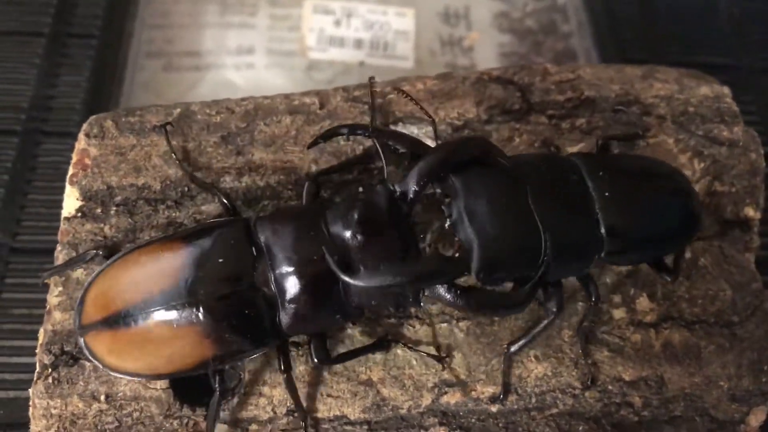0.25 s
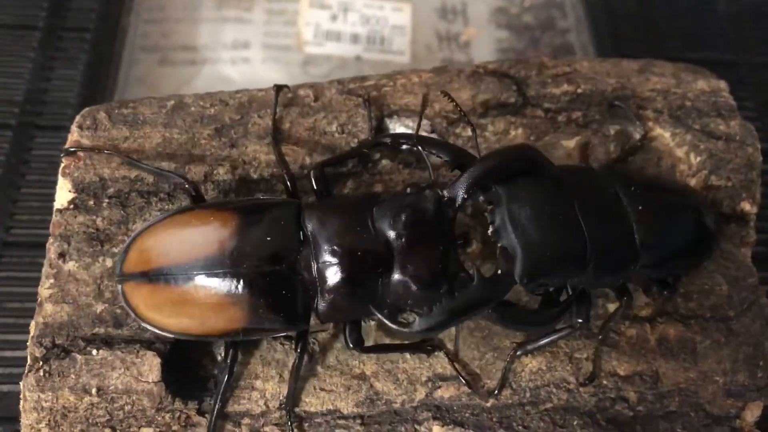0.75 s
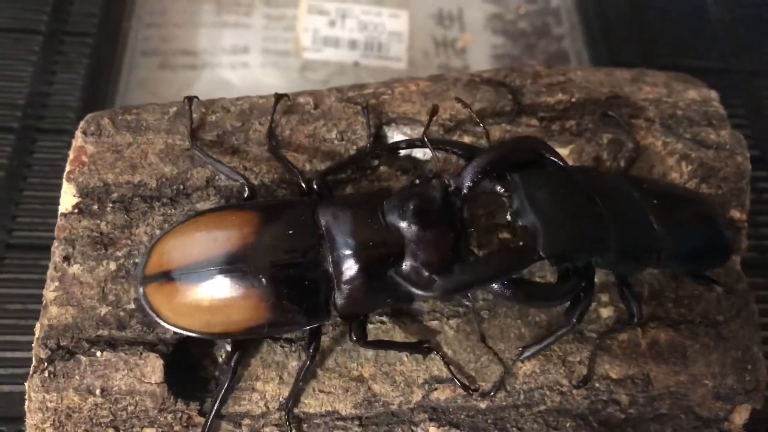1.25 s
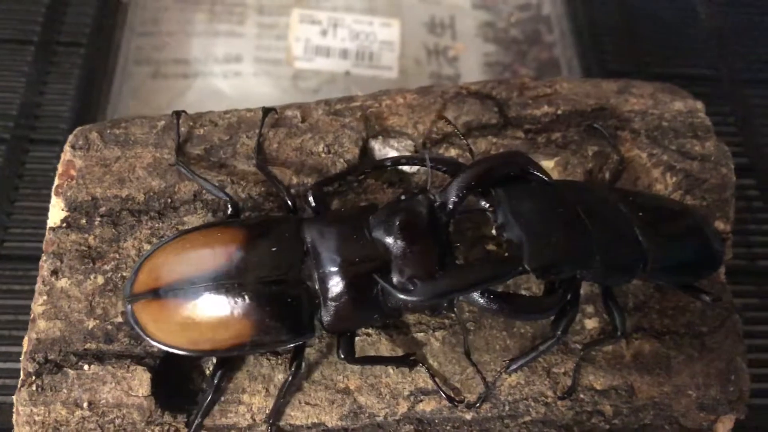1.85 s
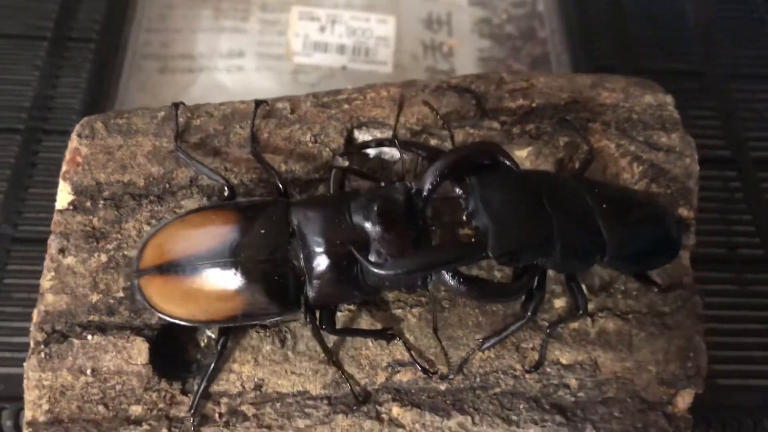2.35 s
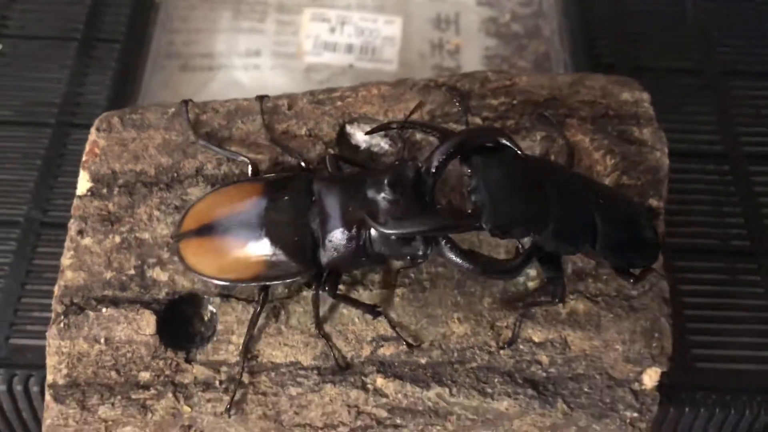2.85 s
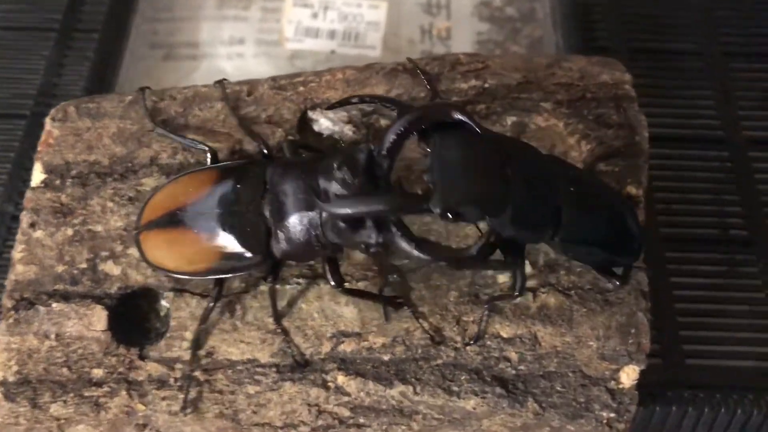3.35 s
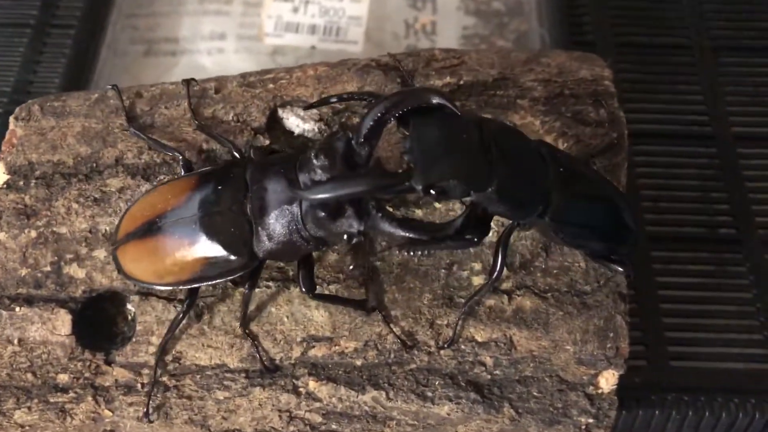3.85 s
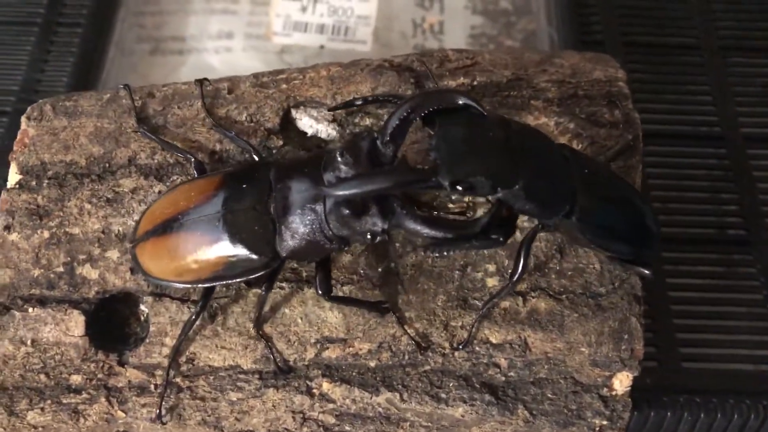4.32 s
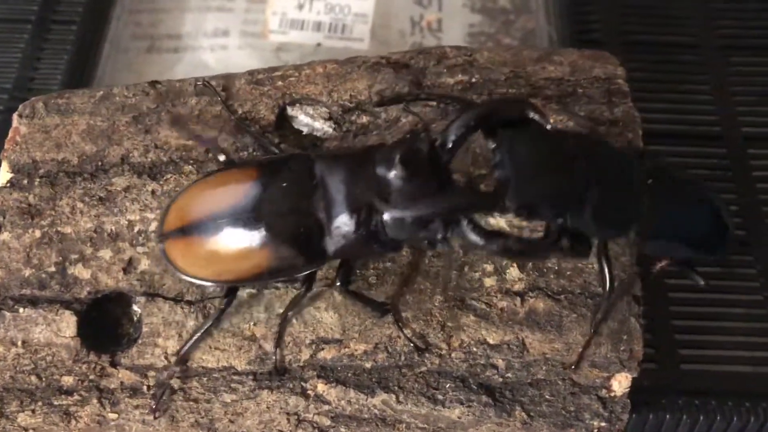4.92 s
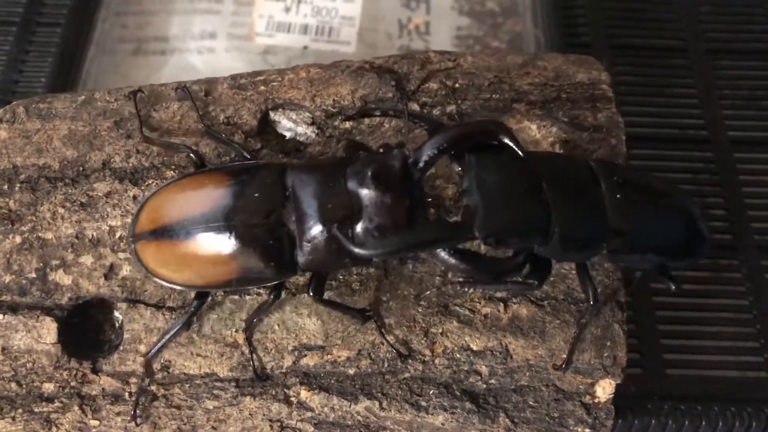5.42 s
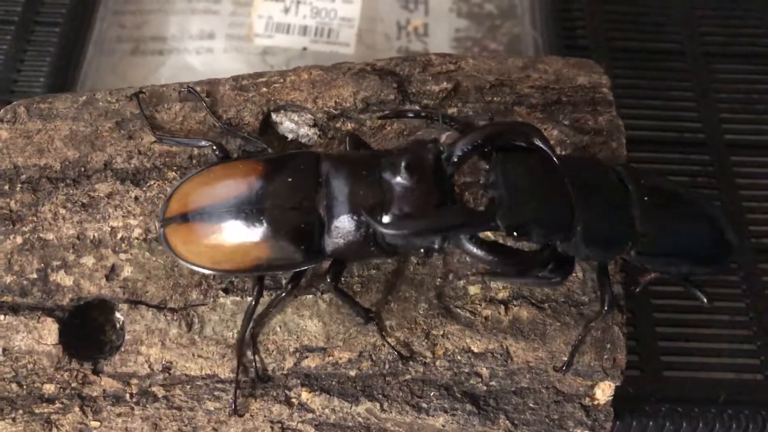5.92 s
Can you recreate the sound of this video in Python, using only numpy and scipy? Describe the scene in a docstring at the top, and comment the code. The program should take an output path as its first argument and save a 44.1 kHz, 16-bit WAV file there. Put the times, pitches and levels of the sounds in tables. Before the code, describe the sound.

Close, dry insect clicks and snaps with brief raspy scratching on bark, low dull log knocks, and a faint steady hiss in a quiet room.

```python
"""A faint scratch, then sharp little clicks: two stag beetles wrestle on a bark-covered log in a quiet room.
Jaws and shells snap and click: tiny noise bursts ring the shell and knock the bark.
Claws scratch the bark with dense, uneven noise grains, and shoves ring the log and its hollow with rough noise.
Faint ticks of feet and feelers fill in; a short noise tail makes the room's answer, over a steady hiss."""
import sys
import numpy as np
from scipy import signal
from scipy.fft import rfft, irfft
from scipy.io import wavfile

SR = 44100
rng = np.random.default_rng(int(sys.argv[2]) if len(sys.argv) > 2 else 0)


def materialize(psi):
    """Save the field psi as 16-bit PCM at rate SR to the path in sys.argv[1].

    A 1-D psi becomes a single channel; in a 2-D psi each row is a channel.
    """
    bounded = np.clip(np.atleast_2d(psi).T, -1, 1)
    quanta = np.round(bounded * 32767).astype(np.int16)
    wavfile.write(sys.argv[1], SR, quanta)


N = 272538  # length of the scene in samples


def undb(db):
    """Turn decibels into a plain multiplier."""
    return 10 ** (np.asarray(db) / 20)


def unit(x):
    """Scale to rms 1."""
    return x / np.sqrt(np.mean(x ** 2))


def band(x, hz, width_hz):
    """One resonance, gain 1 at its centre."""
    return signal.lfilter(*signal.iirpeak(min(hz, .4 * SR), hz / width_hz, SR), x)


def body(x, modes):
    """Add up an object's resonances, neighbours in opposite phase."""
    out = 0
    for k, (hz, width_hz, db) in enumerate(modes):
        out = out + (-1) ** k * undb(db) * band(x, hz, width_hz)
    return out


REBOUND_S, REBOUND_SPREAD, REBOUND_DB = .0014, .15, -9.5  # usual delay, its random spread (log units), level
REBOUND_PER_SNAP_DB, REBOUND_SCATTER_DB = -.5, 4  # bright snaps break clean, dull ringing blows bounce

# The clear jaw and shell clicks. Each row: start in seconds, shell ring energy in dB, ring pitch in Hz,
# snap over ring in dB, snap pitch in Hz, bark knock over ring in dB.
JAW_CLICKS = [(0.0727, -25.5, 4330, -20, 7300, -28), (0.0882, -23, 4200, 4.5, 12700, -16),
              (0.177, -27, 3800, 2, 8100, -31), (0.2204, -31.5, 3810, -2.5, 7760, -22),
              (0.2503, -35, 4250, 5, 8700, -19), (0.3203, -20, 2700, -3, 6600, -6.5),
              (0.3247, -20, 3000, -4, 7500, -14), (0.3599, -30.5, 4220, 9.5, 11300, -11),
              (0.441, -29.5, 2530, -3, 8500, 2), (0.4503, -22.5, 2270, -6, 9200, -9),
              (0.4613, -10.5, 2970, -1, 7860, -1), (0.4693, -17.5, 2710, 3.5, 8200, 3),
              (0.4727, -17, 3030, -2, 9150, -11), (0.4792, -15, 2860, -4.5, 8600, -3),
              (0.5127, -19.5, 3500, -7, 7000, -13), (0.609, -16, 2230, -35.5, 6700, -8),
              (0.625, -24, 3530, 2.5, 7500, 4), (0.692, -28, 4300, -5, 10000, -17),
              (0.711, -12.5, 4000, 0.5, 8000, -14), (0.7192, -15, 3220, -17, 8000, -13),
              (0.7452, -13, 3320, -8, 7800, -31), (0.7711, -12, 3730, -31, 5900, -24),
              (0.7846, -15, 4340, -9, 5670, -23), (0.8059, -7.5, 4130, -6.5, 6850, -22),
              (0.8557, -6, 4500, -3.5, 8100, -24), (0.8743, -10, 3840, -6, 6560, -22),
              (0.899, -4.5, 3800, -17, 6560, -28), (0.925, -35, 2350, -15, 8100, 7),
              (0.9514, -33.5, 2140, -26.5, 8100, 4), (0.991, -19.5, 3450, -7, 6300, -36),
              (1.013, -22.5, 2670, -11, 8750, 2), (1.062, -22.5, 2840, -25, 6800, -11),
              (1.165, -27.5, 2170, -9, 9350, -3), (1.2255, -17, 2790, -15, 6260, -4),
              (1.3076, -28, 3600, 3, 9300, -10.5), (1.3405, -26, 2990, 2, 9240, -10),
              (1.3611, 2.5, 3860, -11.5, 7700, -30), (1.4839, -18.5, 3900, 3.5, 14800, -33),
              (1.507, -22, 2570, -3, 7800, 1), (1.6485, -33, 2610, 2, 6760, 9),
              (1.674, -24.5, 2280, -3.5, 8100, -4.5), (1.7936, -18.5, 2650, -4, 9600, -37),
              (1.8428, -18, 3300, 11.5, 14600, -23), (1.8504, -27.5, 3350, 18.5, 14100, -14),
              (1.8618, -17, 3400, -1, 12700, -15.5), (1.8854, -14.5, 2860, -7.5, 7000, -10.5),
              (2.0038, -51.5, 5270, 28.5, 9000, -6), (2.0296, -34, 4160, 9, 9200, -9),
              (2.1939, -25, 3120, -8, 9700, -15), (2.225, -32.5, 2940, 5.5, 8300, -11),
              (2.2729, -19, 3460, -2, 9200, -17), (2.327, -28.5, 2640, -7, 8700, -4),
              (2.478, -30.5, 3800, 4.5, 10100, -8), (2.4961, -18, 3400, 6, 9540, -22),
              (2.5876, -19.5, 3910, 1, 8170, -14.5), (2.6998, -7.5, 4760, 2.5, 9300, -7),
              (2.7729, -8.5, 4220, 6.5, 9550, -18.5), (2.8023, -21, 2860, 7.5, 9000, -7),
              (2.8937, -17.5, 4000, -30, 6150, -35), (2.9663, -10, 3400, -7, 6560, -38),
              (2.985, -27, 3200, 1.5, 8160, -2.5), (3.0207, -26, 3330, -1, 8800, -4.5),
              (3.0816, -18, 3900, -3.5, 6550, -18), (3.0968, -6, 3800, -6.5, 11400, -23),
              (3.2463, -13.5, 2990, 1, 9200, -10.5), (3.302, 2, 3364, -16.5, 8520, -48),
              (3.3597, -13, 3270, -3.5, 6100, -25), (3.4468, -6, 3180, -7.5, 6500, -22),
              (3.535, -16, 3800, -1, 6330, -24.5), (3.8102, -2.5, 4600, 6, 8750, -22.5),
              (3.9495, -28, 2890, 0, 6940, -6), (4.3788, -34.5, 5050, 10, 7400, -14.5),
              (4.4695, 3, 3700, -4, 8500, -15), (4.472, 5, 2550, -6, 9450, -21.5),
              (4.501, -20, 2020, -16, 6400, 6.5), (4.5635, -15.5, 3520, -4, 8800, -22.5),
              (4.5746, -21, 3130, -11.5, 7590, -14.5), (4.6112, -21.5, 3610, -4, 5760, -29),
              (4.633, -19.5, 2290, -5, 8200, -5), (4.6486, 1.5, 3980, 3.5, 6620, -22),
              (4.6527, -11, 3410, 1.5, 8960, -6), (4.735, -17, 3430, -24, 10500, -9),
              (4.7482, -14.5, 2800, -14, 6550, -36), (4.7562, -14, 3440, 0.5, 9800, -19),
              (4.8091, -20, 1528, -2, 8300, -0.5), (4.8626, -26.5, 3230, -2.5, 5800, -24),
              (4.9204, -32.5, 4170, 1.5, 7300, -25.5), (4.963, -3.5, 3930, 6, 7900, -7),
              (5.014, -22.5, 2420, -6, 7600, -21), (5.1135, -22.5, 3830, -3.5, 11300, -24),
              (5.1495, -25, 4160, -17, 11300, -24), (5.1612, -29, 3310, -4, 7600, -25),
              (5.1846, -18, 3730, -1, 9200, -4), (5.2335, -9, 3830, -2, 9300, -12),
              (5.3061, -27.5, 3700, -1, 8000, -34), (5.4964, -22.5, 3020, -4.5, 9400, -5),
              (5.5054, -22.5, 3830, 7, 7700, -34), (5.649, -8, 3330, -18.5, 6100, -39),
              (5.6677, -19.5, 3720, -4, 7600, -21), (5.7196, -34, 3420, 6, 8200, -24),
              (5.7481, -33, 4060, 8, 10240, -19), (5.7583, -23, 3730, 6.5, 7600, -23),
              (5.9071, -30.5, 3010, -1, 9000, 2.5), (5.9225, -12.5, 2680, -5.5, 7310, -35),
              (5.987, -20, 2550, -0.5, 10200, -4), (5.9998, -12, 4180, 0.5, 8250, -30),
              (6.026, -15, 3260, -8, 8000, -8), (6.0313, -4, 3260, -21, 10700, -39),
              (6.0345, -1, 3250, 4, 14200, -13), (6.0974, -17, 2920, -4, 11500, -23),
              (6.1121, -12, 4060, 16, 13700, -10), (6.1346, -23.5, 4200, 6, 11400, -6),
              (6.1701, -15.5, 2900, -5, 7700, -14)]
# Resonances of hard wing cases and jaws. Each row: pitch in Hz, width in Hz, level in dB.
SHELL_MODES = [(1970, 1500, 0.5), (3450, 470, 6.5), (4250, 820, -3), (5160, 700, 1.5)]


def clicks(grip_s=0.00027, slip_s=0.00026, ring_q=1.89, snap_q=1.41, knock_hz=1000, knock_q=2,
           chatter_db=-24, chatter_s=0.0053, blunt_db=-6):
    """Each contact creeps, lets go in a burst of slips and chatters on; it snaps, rings the shell, knocks bark."""
    lead = 64  # samples of creep before the release
    t = (np.arange(1280) - lead) / SR
    after = np.maximum(t, 0)
    creep = np.exp(np.minimum(t, 0) / grip_s)
    release = np.exp(-after / slip_s) + undb(chatter_db) * np.exp(-after / chatter_s)
    out = np.zeros(N + len(t))
    for s, db, ring_hz, snap_db, snap_hz, knock_db in JAW_CLICKS + catches():
        chance = rng.standard_normal(len(t))
        chance[lead] += 2.5  # the main release stands out of the small slips
        slips = chance * creep * release

        # the jaw tip bounces and strikes again
        late, weak = rng.standard_normal(2)
        delay = int(REBOUND_S * SR * np.exp(REBOUND_SPREAD * late))
        rebound_db = REBOUND_DB + REBOUND_PER_SNAP_DB * snap_db + REBOUND_SCATTER_DB * weak
        slips = slips + undb(min(rebound_db, 0)) * np.roll(slips, delay)

        ring = band(band(slips, ring_hz, ring_hz / ring_q), ring_hz, 2 * ring_hz / ring_q)
        snap = band(band(slips, snap_hz, snap_hz / snap_q), snap_hz, 2 * snap_hz / snap_q)
        knock = band(band(slips, knock_hz, knock_hz / knock_q), knock_hz, 2 * knock_hz / knock_q)
        # the place of the blow picks the modes near its pitch
        ring = body(ring, SHELL_MODES) + undb(blunt_db) * ring

        click = ring / np.linalg.norm(ring)
        click = click + undb(snap_db) * snap / np.linalg.norm(snap)
        click = click + undb(knock_db) * knock / np.linalg.norm(knock)
        i = int(s * SR)
        out[i:i + len(t)] += undb(db) * click
    return out[lead:N + lead]


CATCHES_PER_S = 45  # average rate of claw catches while dragging
CATCH_DB, CATCH_TOP_DB = 24.5, -32  # energy over the drag's level, and its ceiling before random spread


def catches(spread_db=3, ring_oct=0.17, snap_hz=8600, snap_oct=0.65, snap_spread_db=6, knock_spread_db=5):
    """Chance clicks as a dragging claw catches and frees itself, coloured like its drag; rows like JAW_CLICKS."""
    most = 12  # possible catches in one drag
    rows = []
    for s, length, db, hz in CLAW_DRAGS:
        for _ in range(most):
            if rng.random() >= CATCHES_PER_S * length / most:
                continue
            start = s + rng.random() * length
            z = np.clip(rng.standard_normal(5), -2, 2)
            ring_hz = hz * 2 ** (ring_oct * z[0])
            ring_db = min(db + CATCH_DB, CATCH_TOP_DB) + spread_db * z[1]
            hiss_db, rub_db = drag_colour(ring_hz)
            snap_db = hiss_db + snap_spread_db * z[2]
            knock_db = rub_db + knock_spread_db * z[4]
            rows.append((start, ring_db, ring_hz, snap_db, snap_hz * 2 ** (snap_oct * z[3]), knock_db))
    return rows


MID_HZ = 3200  # a middling rasp pitch
HISS_DB, HISS_DB_PER_OCT = -7, 9  # hiss over the rasp at MID_HZ, and change per octave of rasp pitch
RUB_DB, RUB_DB_PER_OCT = -13, -16  # the same for the rub


def drag_colour(hz):
    """A higher rasp hisses more and rubs the log less: both levels in dB over the rasp."""
    octaves = np.log2(hz / MID_HZ)
    return HISS_DB + HISS_DB_PER_OCT * octaves, RUB_DB + RUB_DB_PER_OCT * octaves


# Claws dragging on bark. Each row: start in seconds, length in seconds, level in dB, rasp pitch in Hz.
CLAW_DRAGS = [(0.0, 0.057, -59, 3400), (0.082, 0.018, -58, 4200), (0.14, 0.11, -72, 3300),
              (0.266, 0.061, -64, 3440), (0.407, 0.084, -58.5, 3060), (0.531, 0.094, -64, 3720),
              (0.613, 0.031, -44.5, 3300), (0.708, 0.022, -39.5, 3500), (0.77, 0.053, -58, 3480),
              (0.915, 0.17, -59.5, 2780), (1.1, 0.086, -61, 2720), (1.289, 0.067, -66.5, 2870),
              (1.355, 0.0071, -52, 3800), (1.463, 0.066, -59, 2400), (1.531, 0.105, -61, 2460),
              (1.64, 0.066, -60, 2900), (1.732, 0.071, -66, 2880), (2.001, 0.048, -63, 4430),
              (2.071, 0.072, -65, 3450), (2.3, 0.069, -63, 3750), (2.72, 0.018, -46, 2090),
              (2.788, 0.12, -61.5, 2800), (3.018, 0.052, -57, 3200), (3.169, 0.063, -63, 3700),
              (3.296, 0.0081, -38, 3300), (3.383, 0.08, -59, 2700), (3.963, 0.073, -72.5, 2500),
              (4.102, 0.056, -74, 3160), (4.3, 0.027, -60.5, 4000), (4.588, 0.064, -57.5, 2660),
              (4.661, 0.06, -54, 3600), (4.718, 0.057, -49, 2780), (4.802, 0.06, -51, 3050),
              (4.944, 0.023, -53.5, 3070), (4.968, 0.13, -56, 2610), (5.118, 0.065, -60, 3350),
              (5.215, 0.079, -60.5, 3400), (5.575, 0.028, -65.5, 4270), (5.64, 0.022, -57, 3200),
              (5.695, 0.047, -59, 3620), (5.758, 0.024, -52, 4300), (5.92, 0.014, -31, 3220),
              (5.945, 0.11, -55, 3000), (6.021, 0.0071, -39, 3200), (6.033, 0.071, -55.5, 3220),
              (6.132, 0.045, -62, 3120)]


def scratch(per_s=1400, scatter_db=3, grain_s=0.0015, rasp_q=0.99, edge_s=0.0023, ease=0.4):
    """Dense uneven claw-tip catches rasp at the pitch of the ridge they cross, hiss above it, rub the log below."""
    hits = rng.random(N) < per_s / SR
    hits = hits * undb(scatter_db * np.minimum(rng.exponential(size=N), 3.5))
    fading = signal.lfilter([1], [1, -np.exp(-1 / (grain_s * SR))], hits)
    grains = unit(fading * rng.standard_normal(N))
    hiss = unit(band(band(grains, 5600, 4700), 8300, 11000))
    rub = unit(band(band(grains, 1100, 630), 510, 1200))
    out = np.zeros(N)
    for s, length, db, hz in CLAW_DRAGS:
        hiss_db, rub_db = drag_colour(hz)
        span = slice(max(int((s - edge_s) * SR), 0), int((s + length + edge_s) * SR))
        rasp = band(band(grains[span], hz, hz / rasp_q), hz, hz / rasp_q)
        rasp = rasp * np.sqrt(rasp_q * SR / hz / 2)  # make up for the narrow band
        grip = signal.windows.tukey(len(rasp), min(ease, 1))  # the claw bites and lets go gradually
        out[span] += undb(db) * grip * (rasp + undb(hiss_db) * hiss[span] + undb(rub_db) * rub[span])
    return out


MID_SHOVE_DB = -40  # level of a middling shove
HOLLOW_DB, HOLLOW_PER_DB = -2, .3  # hollow's drive for a middling shove, and extra dB per dB of harder shove

# Shoves that rock the log. Each row: start in seconds, level in dB, time to fade by 60 dB in seconds.
LOG_SHOVES = [(0.098, -60.5, 0.15), (0.332, -48.5, 0.12), (0.473, -48.5, 0.3), (0.627, -49.5, 0.3),
              (0.717, -40, 0.3), (0.811, -47, 0.63), (1.024, -53, 0.36), (1.23, -52, 1),
              (1.31, -45.5, 0.56), (1.487, -37, 0.049), (2.234, -51.5, 0.75), (2.486, -39.5, 0.24),
              (2.595, -41.5, 0.15), (2.699, -33.5, 0.13), (2.712, -27.5, 0.19), (2.78, -44.5, 0.56),
              (2.998, -53, 0.54), (3.126, -48.5, 0.13), (3.249, -49, 0.3), (3.312, -46, 0.34),
              (3.458, -39.5, 0.088), (3.816, -51.5, 0.2), (3.957, -46, 0.22), (4.379, -49, 0.12),
              (4.473, -28.5, 0.23), (4.488, -35.5, 0.36), (4.654, -38.5, 0.22), (4.757, -44.5, 0.37),
              (4.966, -38, 0.19), (5.183, -44, 0.38), (5.242, -38, 0.076), (5.508, -39.5, 0.072),
              (5.672, -46, 0.16), (5.925, -38.5, 0.25), (6.046, -45.5, 1)]
# Low resonances of the log. Each row: pitch in Hz, width in Hz, level in dB.
LOG_MODES = [(104.5, 96, 1), (216, 89, 3.5), (303, 65, -1)]
# Overtones of the hollow log. Each row: pitch in Hz, width in Hz, level in dB.
HOLLOW_MODES = [(472, 170, -7), (820, 80, -41.5), (990, 230, -22.5)]


def shoves(rise_s=0.0029):
    """A rough force swells within a moment and dies away, ringing the log and its hollow."""
    t = np.arange(N) / SR
    force, sharp = np.zeros(N), np.zeros(N)
    for s, db, t60 in LOG_SHOVES:
        age = np.maximum(t - s, 0)
        fade_db = -60 * age / t60
        swell = undb(db + fade_db) * (1 - np.exp(-age / rise_s))
        force += swell
        hollow_db = HOLLOW_DB + HOLLOW_PER_DB * (db - MID_SHOVE_DB)
        sharp += undb(hollow_db + fade_db) * swell  # overtones fade twice as fast
    rough = rng.standard_normal(N)
    log = body(force * rough, LOG_MODES)
    hollow = body(sharp * rough, HOLLOW_MODES)
    log = signal.sosfilt(signal.butter(3, (60, 340), "band", fs=SR, output="sos"), log)
    return (log + hollow) / np.std(body(rough, LOG_MODES))


def fidget(per_s=130, scatter_db=3, tick_s=.0006, colour_db=5):
    """Feet and feelers keep touching bark: faint random ticks, each with a colour of its own."""
    touch = (rng.random(N) < per_s / SR) * undb(scatter_db * rng.exponential(size=N))
    out = 0
    for hz, db in ((2600, -79.0), (5000, -82.5), (11000, -78.5)):
        size = touch * undb(colour_db * rng.standard_normal(N))
        tick = signal.lfilter([1], [1, -np.exp(-1 / (tick_s * SR))], size) * rng.standard_normal(N)
        out = out + undb(db) * unit(band(band(tick, hz, 1.7 * hz), hz, 1.7 * hz))
    return out


def room(x, t60_s=0.15, gap_s=0.013, width_hz=7000):
    """A diffuse tail of reflections builds up and fades, duller than the direct sound."""
    t = np.arange(SR // 2) / SR
    tail = rng.standard_normal(len(t)) * undb(-60 * t / t60_s) * (1 - np.exp(-t / gap_s))
    tail = band(tail, 2000, width_hz)
    return signal.fftconvolve(x, tail / np.linalg.norm(tail))[:N]


AIR_DB = -67  # overall level of the background

# Colour of the background hiss. Each row: frequency in Hz, relative level in dB per Hz.
AIR_SPECTRUM = [(18, -39.5), (45, -11), (140, -3.5), (344, -12), (585, -19), (1300, -25), (3000, -28.5),
                (8000, -33), (15800, -36), (17000, -50.5)]


def air():
    """The quiet room and the microphone's own hiss: steady noise shaped across frequency."""
    hz, db = np.transpose(AIR_SPECTRUM)
    f = np.maximum(np.arange(N // 2 + 1) * SR / N, 1)
    colour = undb(np.interp(np.log(f), np.log(hz), db))
    noise = irfft(rfft(rng.standard_normal(N)) * colour, N)
    return undb(AIR_DB) * unit(noise)


def scene():
    """Beetles close by, room behind."""
    near = clicks() + scratch() + fidget()
    echo = undb(-26.0) * room(near)
    return (near + echo + shoves() + air())[None]


def record(dry):
    """The deepest bass (below 45 Hz) is missing and the sound ends at about 16100 Hz."""
    dry = signal.sosfilt(signal.butter(2, 45, "high", fs=SR, output="sos"), dry)
    return signal.sosfilt(signal.ellip(7, .2, 70, 16100, fs=SR, output="sos"), dry)


dry = scene()
out = record(dry)
materialize(out)
```